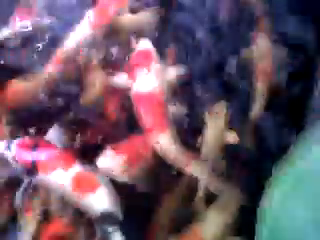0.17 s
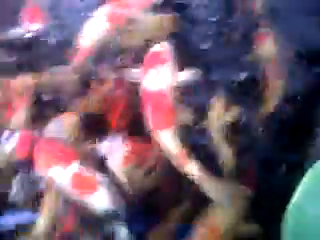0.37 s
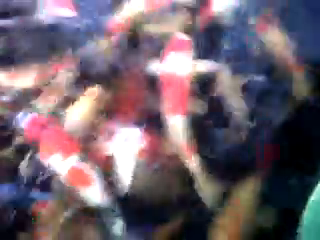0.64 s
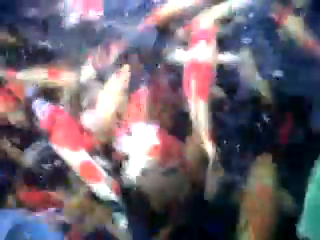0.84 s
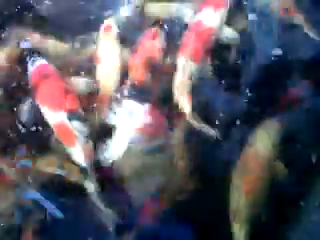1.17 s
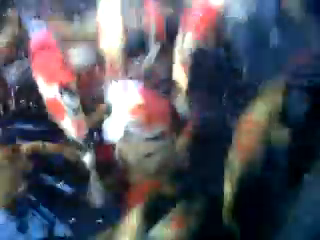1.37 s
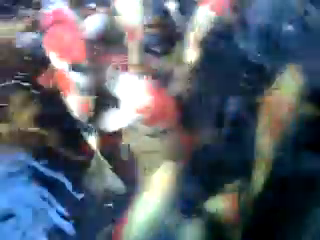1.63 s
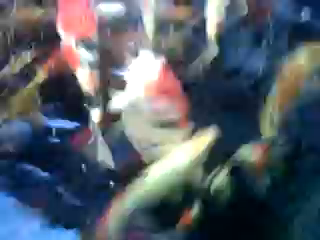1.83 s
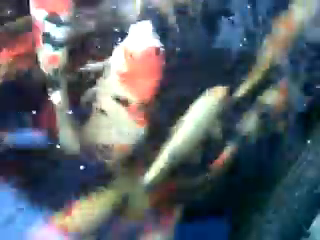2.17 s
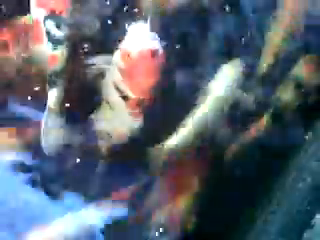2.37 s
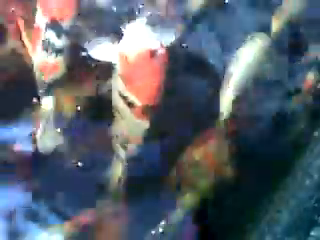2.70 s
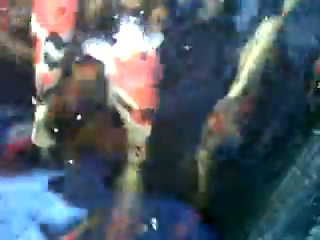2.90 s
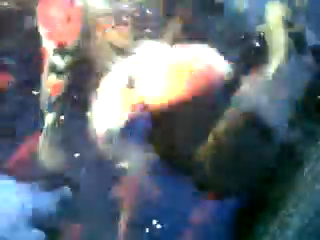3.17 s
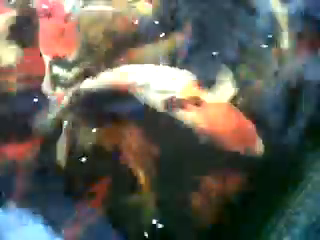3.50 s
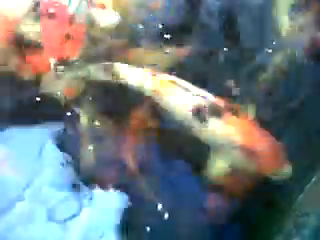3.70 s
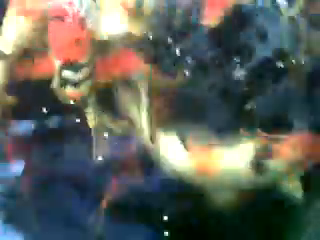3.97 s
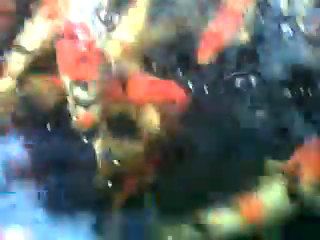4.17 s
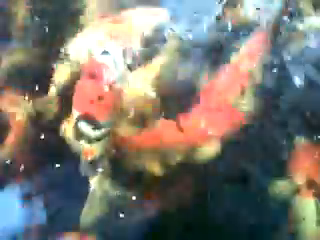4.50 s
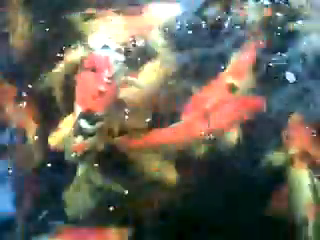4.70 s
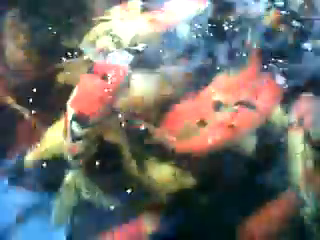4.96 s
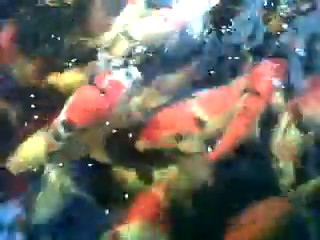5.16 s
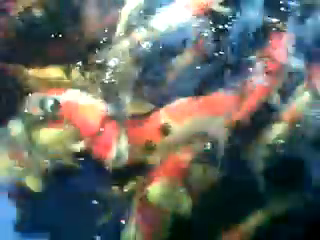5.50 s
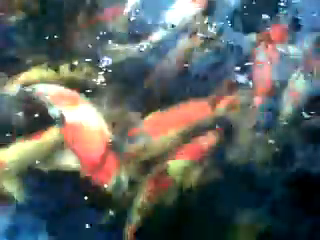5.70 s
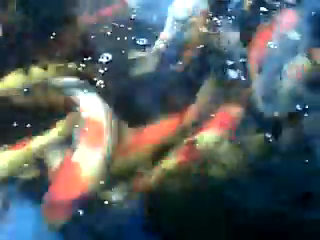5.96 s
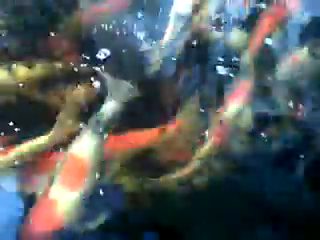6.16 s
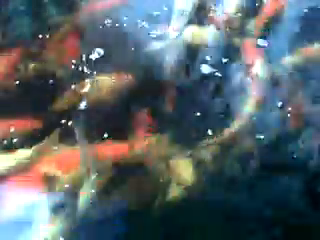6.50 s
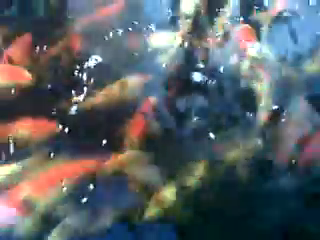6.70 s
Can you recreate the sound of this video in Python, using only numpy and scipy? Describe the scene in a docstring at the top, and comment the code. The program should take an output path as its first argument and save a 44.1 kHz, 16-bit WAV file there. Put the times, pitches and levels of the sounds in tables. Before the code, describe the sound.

Close irregular bubble pops, quick rising slurps and little drop splashes from feeding fish, above steady gurgling water and a low hum, dully captured.

```python
"""Koi crowd at the surface of a pond, close by: their mouths slurp in short notes that mostly rise steeply.
Air pockets pop as decaying bubble tones, splashes scatter drops, and chains of like-sized bubbles ring.
Farther off, other fish nibble; the pond's rim answers faintly with a short scatter of reflections.
Behind them running water gurgles and trickles as bubbles over noise, and a pump hums in steady lines over a rumble.
A small, dull microphone hears it all, without deep bass or high treble."""
import sys
import numpy as np
from scipy import signal
from scipy.fft import rfft, irfft, next_fast_len
from scipy.io import wavfile
from scipy.ndimage import uniform_filter1d, map_coordinates

SR = 44100
rng = np.random.default_rng(int(sys.argv[2]) if len(sys.argv) > 2 else 0)


def master(y):
    """Save y as 16-bit WAV."""
    cut = np.clip(np.atleast_2d(y).T, -1, 1)
    pcm = np.round(cut * 32767)  # scale
    wavfile.write(sys.argv[1], SR, pcm.astype(np.int16))


N = 302085  # samples


def amp(db):
    """Decibels to gain."""
    return 10 ** (np.asarray(db) / 20)


def unit(x):
    """x scaled to rms 1."""
    return x / np.sqrt(np.mean(x ** 2) + 1e-20)


def wobble(rate):
    """A smooth random curve through rate random knots a second."""
    knots = rng.standard_normal(int(N * rate / SR) + 4)
    return map_coordinates(knots, [np.arange(N) * rate / SR])


def curves(rows):
    """One value per sample for each column after the time."""
    s, *columns = np.transpose(rows)
    return [np.interp(np.arange(N) / SR, s, column) for column in columns]


def filtered(x, response):
    """x with its spectrum multiplied by a response of frequency."""
    m = next_fast_len(N + 8192)
    spectrum = rfft(x, m) * response(np.fft.rfftfreq(m, 1 / SR))
    return irfft(spectrum, m)[:N]


def coloured(x, points):
    """x shaped by (f/Hz, level/dB) points on a log frequency axis, at rms 1."""
    f, db = np.transpose(points)
    return unit(filtered(x, lambda hz: amp(np.interp(np.log(hz + 1), np.log(f), db))))


def add(track, s, sound):
    """Mix a sound into the track at time s."""
    start = max(round(s * SR), 0)
    part = track[start:start + len(sound)]
    part += sound[:len(part)]


def bubble(t, hz, cycles, rise=0.027, softness=3.95):
    """An air pocket swells smoothly and dies within a few cycles; its pitch climbs as it opens."""
    age = t * hz / cycles  # 1 at the loudest moment
    bend = 1 + rise * (np.tanh(age) - np.tanh(1))
    phase = cycles * (age - 1) * bend
    swell = (age * np.exp(1 - age)) ** softness
    return swell * np.cos(2 * np.pi * phase)


def drops(times, middle_hz, spread, cycles, scatter_db, size):
    """Many small bubbles of random pitch, life, strength and sign, in a track of size samples."""
    pitch, life, strength, sign = rng.standard_normal((len(times), 4)).T[..., None]
    ticks = np.arange(SR // 70)
    rings = bubble(ticks / SR, middle_hz * np.exp(spread * pitch), cycles * np.exp(life / 2))
    rings = rings * np.sign(sign) * amp(scatter_db * np.minimum(strength, 2))
    places = (times[:, None] * SR).astype(int) + ticks
    return np.bincount(places.ravel(), rings.ravel(), size)[:size]


def slurps(flutter_rate=220, froth=0.14, froth_rate=1000):
    """The cavity's note climbs as water fills it, then sinks and fades as the lips close; uneven inflow shakes it."""
    # gulps of the mouths: t/s, length of the climb/s, first f/Hz, climb/(Hz per s), level/dB
    gulps = [(0.008, 0.039, 681, 496, -37), (0.391, 0.037, 442, 15000, -35.5),
             (0.441, 0.024, 300, 5500, -33.5), (0.564, .034, 1302, 19100, -40),
             (0.734, 0.016, 490, 3200, -35), (1.48, 0.025, 196, 11550, -41),
             (1.836, 0.042, 537, 13000, -38), (1.866, 0.018, 213, 3500, -35.5),
             (1.922, 0.073, 240.8, 9420, -35), (2.153, 0.022, 351, 2400, -38),
             (2.6007, 0.012, 382, 110700, -28), (5.161, 0.028, 1500, 20000, -40),
             (5.31, 0.0285, 595, 3770, -29.5), (5.333, 0.028, 698, 9100, -37),
             (5.49, 0.027, 256, 4020, -38.5), (5.657, 0.033, 649, 11000, -37.5),
             (5.8, 0.018, 1685, 16900, -33.5), (5.84, 0.025, 239, 11440, -31)]
    late = 1.25  # above 1, a gulp is loudest after the middle of its climb
    sink, tail_db = .2, -8.5  # closing lips: share of pitch lost, tail level against the swell
    rough, waver_rad = .18, .14  # shake of the strength and of the phase
    track = np.zeros(N, complex)
    for s, length, first_hz, climb, db in gulps:
        t = np.arange(int(2 * length * SR)) / SR
        opening = np.minimum(t / length, 1)
        closing = np.maximum(t / length - 1, 0)
        hz = (first_hz + climb * length * opening) * (1 - sink * np.tanh(4 * closing))
        swell = np.abs(np.sin(np.pi * opening ** late)) ** 0.71
        tail = amp(tail_db) * opening ** 2 * (1 - closing)
        note = np.exp(2j * np.pi * np.cumsum(hz) / SR)
        add(track, s, amp(db) * np.hypot(swell, tail) * note)
    flutter = (1 + rough * wobble(flutter_rate)) * np.exp(1j * waver_rad * wobble(flutter_rate))
    # froth at the lips spreads a faint wet rasp around the note
    rasp = froth * (wobble(froth_rate) + 1j * wobble(froth_rate))
    return np.real(track * (flutter + rasp))


def pops(count=3):
    """A pocket bursts at the surface and breaks into a few daughter bubbles, each fainter than the last."""
    # air pockets bursting at lips and fins: t of the peak/s, level/dB, f/Hz, swell time/cycles
    bursts = [(.4487, -27, 600, 0.66), (.4526, -23.5, 520, 0.74), (.4582, -29.5, 480, 0.6),
              (.4907, -31, 780, 0.5), (.7297, -20, 790, 0.86), (.739, -29.5, 1130, 3),
              (.746, -27, 1500, 0.93), (.764, -24, 1140, 0.47), (0.8961, -16, 1370, 0.71),
              (0.9532, -21.5, 1250, 0.94), (1.133, -38.5, 327, 1.3), (1.328, -30.5, 920, 1.7),
              (1.549, -23, 1310, 1.9), (1.5531, -23.5, 750, 0.9), (2.155, -24.5, 450, 1.1),
              (2.195, -38.5, 3000, 12), (2.202, -23, 850, 1.25), (2.214, -30, 970, 2.1),
              (2.311, -25.5, 1340, 1.5), (2.537, -20, 800, 0.89), (2.5375, -22, 1440, 2.3),
              (2.5997, -25.5, 680, 1.2), (2.6111, -25, 1950, 1.9), (2.6112, -13, 1140, 1.46),
              (2.6168, -22, 1760, 2.3), (2.6184, -24, 950, 1.6), (2.63, -31, 1400, 5),
              (2.66, -22.5, 1310, 4.5), (2.6653, -24.5, 1520, 5.8), (2.6765, -25, 1350, 1.6),
              (2.688, -24.5, 1260, 3.1), (2.794, -18.5, 1350, 0.93), (2.9093, -20.5, 1750, 1.3),
              (2.9153, -26.5, 1470, 4.1), (2.9458, -22.5, 824, 1.3), (3.34, -22, 1060, 2.5),
              (3.401, -16.5, 1470, 1.64), (3.6655, -28.5, 830, 3.6), (3.8124, -26.5, 1200, 2.1),
              (4.076, -27.5, 1350, 1), (4.644, -32.5, 800, 1.6), (4.946, -29.5, 900, 1.2),
              (5.384, -33, 1400, 4.6), (5.4075, -12.5, 1660, 1.3), (5.4091, -20, 2560, 1.9),
              (5.4137, -18, 1260, 0.86), (5.4161, -29, 950, 1.8), (5.445, -23, 1480, 4.8),
              (5.4485, -14.5, 1320, 1.3), (5.506, -30, 1600, 3), (5.585, -21.5, 935, 1.4),
              (5.588, -29, 490, 2), (5.612, -33, 1470, 4), (5.639, -31, 1550, 3), (5.694, -31, 1630, 3.4),
              (5.7857, -24.5, 1610, 3.3), (5.804, -26, 1600, 1.3), (5.812, -36.5, 527, 3.8),
              (5.831, -30, 1650, 2.8), (5.878, -37, 440, 2.5)]
    gap_s, first_db, loss_db = 0.0065, -12, 8.5  # daughters: spacing, level against parent, loss for each next
    pitch_ratio, daughter_cycles = 1.12, 1.1  # middle pitch over the parent's, swell time
    track, t = np.zeros(N), np.arange(SR // 25) / SR
    chance = rng.standard_normal((len(bursts), count, 2))
    for (s, db, hz, cycles), daughters in zip(bursts, chance):
        add(track, s - cycles / hz, amp(db) * bubble(t, hz, cycles))
        for k, (late, pitch) in enumerate(daughters):
            ring = bubble(t, hz * pitch_ratio * np.exp(.2 * pitch), daughter_cycles)
            delay = gap_s * (k + np.exp(0.21 * late) / 2)
            add(track, s + delay, amp(db + first_db - loss_db * k) * ring)
    return track


def splashes(drop_rate=220):
    """A stirred patch sheds a short, fading shower of drops and a faint fine spray."""
    # splashes of fins and backs: t/s, length/s, rms level/dB, middle drop f/Hz
    patches = [(0.012, 0.044, -46, 910), (0.469, 0.046, -46, 604), (.745, 0.05, -51, 856),
               (0.939, 0.02, -41, 1160), (2.16, 0.018, -46, 725), (2.607, .035, -55.5, 4500),
               (2.614, 0.16, -45, 1370), (4.917, 0.04, -48, 1560), (5.36, .024, -51, 3650),
               (5.416, 0.13, -55.5, 2700), (5.492, 0.041, -42.5, 1580), (5.604, 0.15, -49, 1460),
               (5.785, 0.047, -44.5, 1460), (5.918, 0.049, -44, 1570)]
    spray_db, spray_hz = -20.5, 3100  # the finest drops: level against the shower, middle pitch
    track = np.zeros(N)
    for s, length, db, hz in patches:
        times = np.arange(0, length, 1 / drop_rate)
        times = times + rng.random(len(times)) / drop_rate
        size = int(length * SR) + SR // 70
        shower = drops(times, hz, spread=0.14, cycles=1.687, scatter_db=4.5, size=size)
        spray = drops(times, spray_hz, spread=0.58, cycles=0.94, scatter_db=0.5, size=size)
        splash = unit(shower) + amp(spray_db) * unit(spray)
        add(track, s, amp(db) * unit(splash * np.linspace(1, .4, size)))
    return track


def chains(bubble_rate=400, width_hz=95):
    """Churned air rises as a chain of like-sized bubbles, which all ring near one pitch."""
    # bubble chains: t/s, length/s, rms level/dB, f/Hz
    risers = [(0.032, 0.064, -50, 714), (1.39, 0.19, -46, 1660), (1.587, 0.12, -47.5, 1690),
              (2.019, 0.36, -49.5, 1296), (3.788, .38, -48, 1295), (6.199, 0.37, -49, 1272)]
    track = np.zeros(N)
    for s, length, db, hz in risers:
        size = int(length * SR)
        times = np.arange(0, length, 1 / bubble_rate)
        times = times + rng.random(len(times)) / bubble_rate
        bubbles = drops(times, hz, spread=.08, cycles=2.003, scatter_db=2.5, size=size)
        ringing = signal.lfilter(*signal.iirpeak(hz, hz / width_hz, SR), bubbles)
        add(track, s, amp(db) * unit(ringing * signal.windows.tukey(size, .5)))
    return track


def strays(count=70):
    """Other fish nibble farther off: single faint bubbles at random moments."""
    typical_hz, typical_db = 954, -41
    times = rng.random(count) * N / SR
    return amp(typical_db) * drops(times, typical_hz, spread=.36, cycles=2.2, scatter_db=1.5, size=N)


def rim(x, t60=.2, delay=0.002):
    """A short, decaying scatter of reflections from the pond's edge."""
    t = np.arange(SR // 3) / SR
    tail = rng.standard_normal(len(t)) * amp(-60 * t / t60) * (t > delay)
    return signal.fftconvolve(x, tail / np.linalg.norm(tail))[:N]


def patchy(x, depth_db):
    """Neighbouring bands swell and fade on their own."""
    z = signal.stft(x, nperseg=1024)[2]
    across_bands = uniform_filter1d(rng.standard_normal(z.shape), 5, 0)
    field = uniform_filter1d(across_bands, 18, 1)  # smoothed along time too
    return unit(signal.istft(z * amp(depth_db * unit(field)), nperseg=1024)[1][:N])


def running_water():
    """Dense small bubbles on a wash of noise: large ones gurgle, small ones trickle."""
    # moving water, before the trims below: t/s, gurgle level/dB, trickle level/dB
    stir = [(0.0, -51, -42.5), (0.78, -45.5, -41.5), (1.03, -48, -42.5), (1.81, -48, -42.5),
            (2.1, -44.5, -42.5), (2.38, -47.5, -42.5), (2.8, -45, -42), (3.07, -49, -42),
            (3.79, -46, -41.5), (4.83, -51.5, -42.5), (5.27, -48, -43), (5.53, -43.5, -41.5),
            (6.62, -50, -43.5), (6.85, -51, -41.5)]
    # spectrum of the large bubbles and their wash: f/Hz, relative level/dB
    gurgle_colour = [(150, -21.5), (280, -0.5), (450, 3), (750, 4.5), (1100, -1.5), (2000, -45)]
    # spectrum of the small bubbles and their wash: f/Hz, relative level/dB
    trickle_colour = [(500, -17.5), (900, -6), (1050, -2), (1170, -2.5), (1265, 0), (1500, -2.5), (1700, 0),
                      (2000, -4.5), (2280, -11.5), (2950, -13), (3380, -17), (3720, -24), (4400, -28),
                      (5300, -35), (6200, -40), (7200, -56.5)]
    gurgle_trim_db, trickle_trim_db = -1.02, -0.2
    gurgle_db, trickle_db = curves(stir)

    large = drops(rng.random(1500) * N / SR, 557, spread=.45, cycles=1.247, scatter_db=2.5, size=N)
    gurgle_wash = coloured(rng.standard_normal(N), gurgle_colour)
    gurgle = unit(gurgle_wash + amp(-4.5) * coloured(large, gurgle_colour))

    small = drops(rng.random(3000) * N / SR, 1455, spread=.25, cycles=2.32, scatter_db=1.0, size=N)
    trickle_wash = coloured(rng.standard_normal(N), trickle_colour)
    trickle = patchy(trickle_wash + amp(-6.5) * coloured(small, trickle_colour), depth_db=1.5)

    low = amp(gurgle_db + gurgle_trim_db + 1.3 * wobble(12)) * gurgle
    high = amp(trickle_db + trickle_trim_db + 0.58 * wobble(16)) * trickle
    return low + high


def pump(follow=1.0):
    """Slightly unsteady mains lines and a thin whine over a low rumble; the deepest lines swell with it."""
    # low rumble, before the trim below: t/s, level/dB
    rumble_level = [(0.0, -53.5), (0.55, -52), (3.15, -48.5), (3.55, -53), (6.49, -53), (6.85, -54)]
    # spectrum of the rumble: f/Hz, relative level/dB
    rumble_colour = [(20, -31), (42, -15.5), (62, -17), (80, -5), (120, -0.5), (170, -1.5), (250, -7.5),
                     (450, -21), (1000, -46)]
    # pump lines and whine, before their swell and wobble: f/Hz, amplitude level/dB
    lines = [(50, -68.5), (99.9, -54), (200.1, -55), (1234.7, -56), (2203, -68), (6914, -88)]
    rumble_trim_db = -1.5
    t = np.arange(N) / SR
    level_db, = curves(rumble_level)
    sound = amp(level_db + rumble_trim_db) * coloured(rng.standard_normal(N), rumble_colour)
    for hz, db in lines:
        swell_db = follow * (level_db - level_db.mean()) * (hz < 150)
        strength = amp(db + swell_db + 0.81 * wobble(2.1))
        sound = sound + strength * np.sin(2 * np.pi * hz * t + 0.35 * wobble(3.6))
    return sound


def scene():
    """The fish close by, the rim's answer, the water and pump behind."""
    fish = slurps() + pops() + splashes() + chains() + strays()
    # soft water contacts carry neither deep bass nor high treble
    fish = filtered(fish, lambda hz: hz / np.hypot(hz, 130) / np.sqrt(1 + (hz / 3400) ** 10))
    return (fish + amp(-10.0) * rim(fish) + running_water() + pump())[None]


def record(dry):
    """The small microphone loses deep bass; nothing passes above its band limit."""
    top_hz, fade_hz = 7250, 220  # band limit, width of the slope just below it
    thin = filtered(dry[0], lambda hz: hz ** 3 / np.sqrt(hz ** 6 + 42. ** 6))
    return filtered(thin, lambda hz: np.clip((top_hz - hz) / fade_hz, 0, 1))[None]


dry = scene()
out = record(dry)
master(out)
```